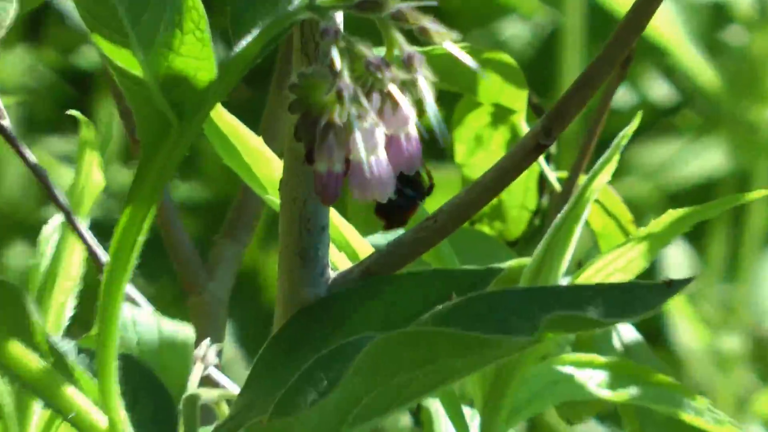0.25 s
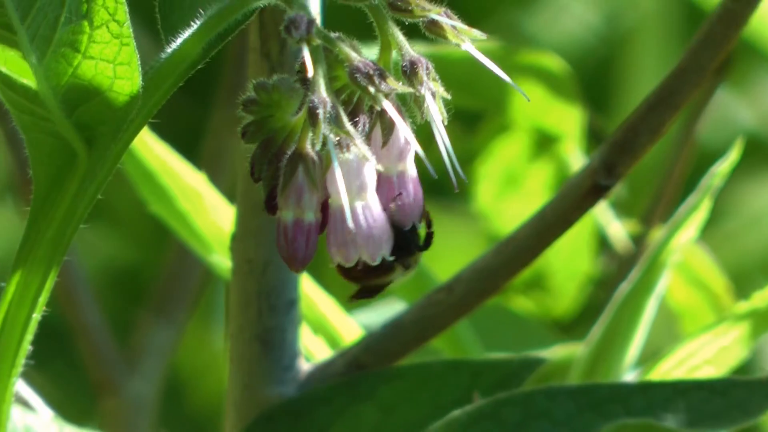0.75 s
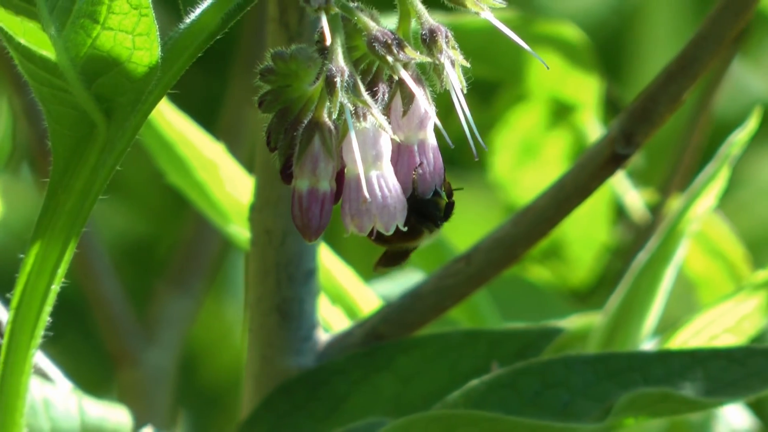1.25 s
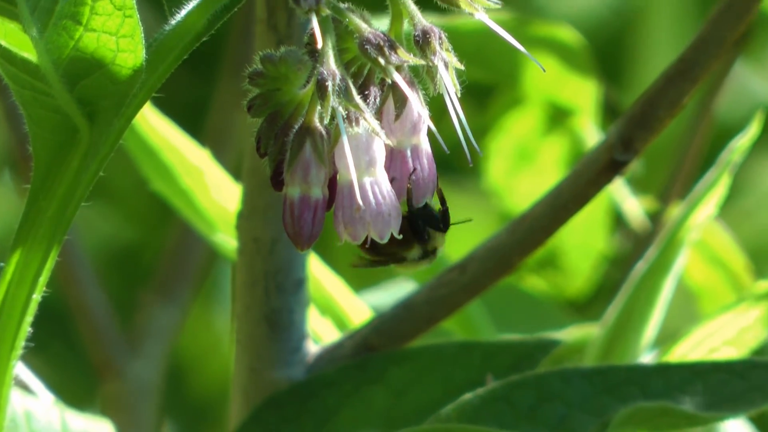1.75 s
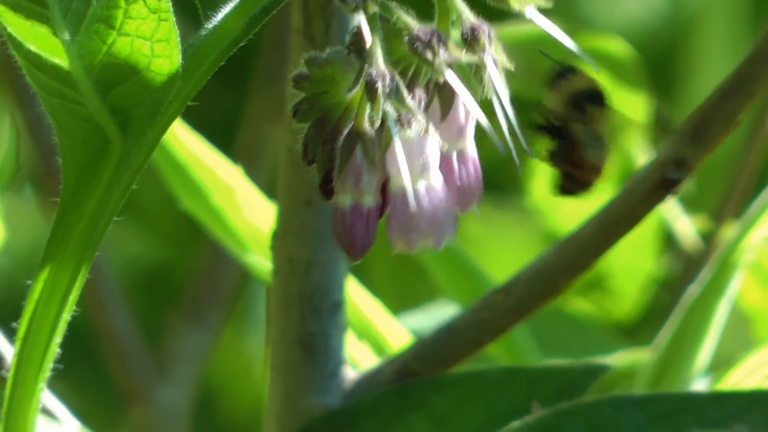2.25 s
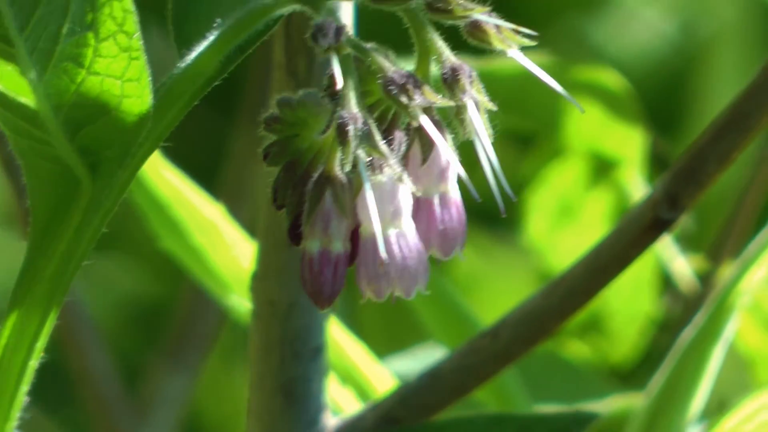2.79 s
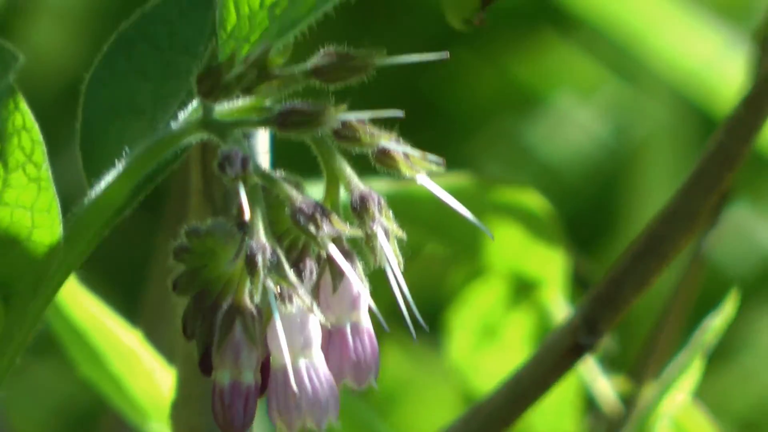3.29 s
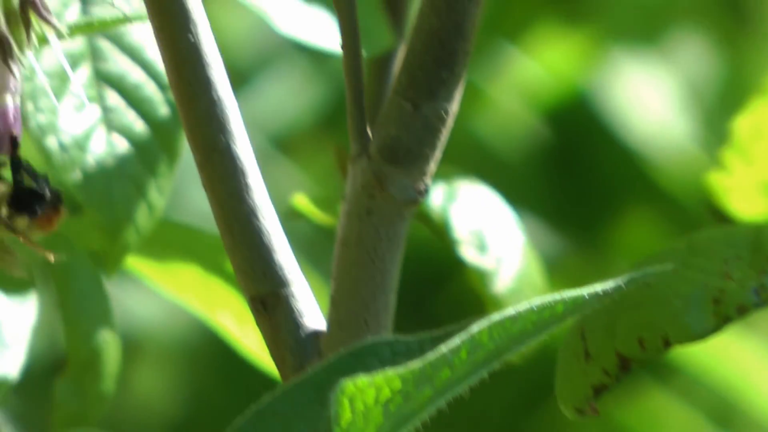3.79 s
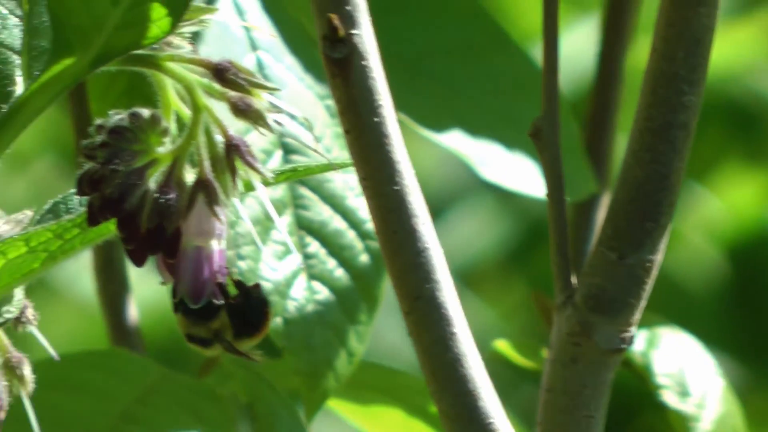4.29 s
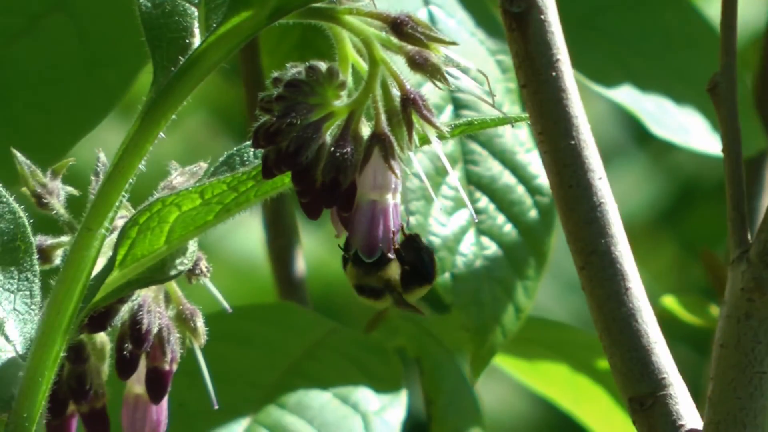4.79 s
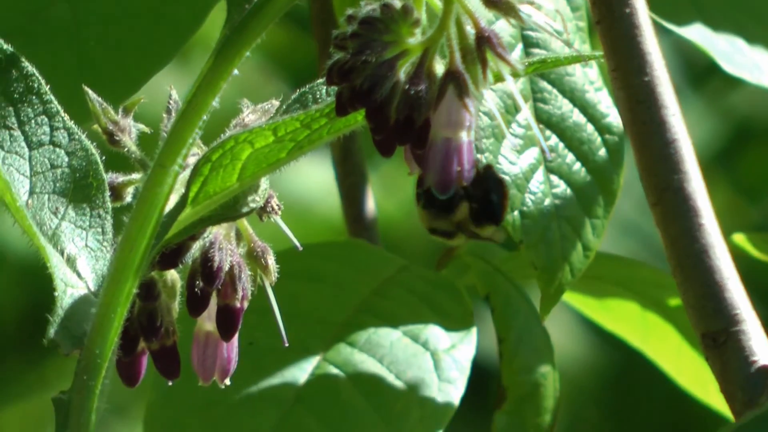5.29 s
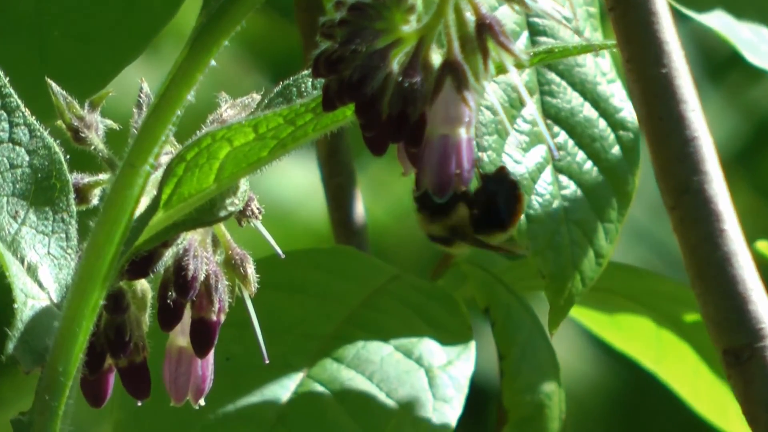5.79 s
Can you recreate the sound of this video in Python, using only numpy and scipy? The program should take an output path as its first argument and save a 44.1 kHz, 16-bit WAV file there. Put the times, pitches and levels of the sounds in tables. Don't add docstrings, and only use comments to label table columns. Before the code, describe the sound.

Outdoors in a garden, a bumblebee hums steadily at first, then stops and starts in soft pulses, rising in pitch as it flies off. After a pause a lower, rougher buzz returns and settles. Small birds twitter quickly at the start and again, louder, at the end, with thin distant whistles between. Leaf hiss and far traffic rumble lie underneath, in stereo leaning right.

```python
import sys
import numpy as np
from scipy import signal
from scipy.fft import rfft, irfft, next_fast_len
from scipy.io import wavfile
from scipy.ndimage import uniform_filter1d

SR = 44100
rng = np.random.default_rng(int(sys.argv[2]) if len(sys.argv) > 2 else 0)


def waveform_to_disk(signal):
    frames = np.transpose(np.atleast_2d(signal))
    scaled = np.clip(frames, -1, 1) * 32767
    samples = np.round(scaled).astype(np.int16)
    wavfile.write(sys.argv[1], SR, samples)


def nominal_scale(level):
    x = np.asarray(level, float) / 20
    return 10 ** x


N = 266540


def rms_one(x):
    return x / np.sqrt(np.mean(x ** 2) + 1e-20)


def at_hz(points, hz):
    table = np.array(points)
    return np.interp(np.log(hz), np.log(table[:, 0]), table[:, 1])


def drift(rate, count):
    r = np.exp(-2 * np.pi * rate / SR)
    settle = 8192
    white = rng.standard_normal((count // settle + 2) * settle)
    return rms_one(signal.lfilter([1], [1, -2 * r, r * r], white)[settle:][:count])


def panned(x, lean_db):
    left = nominal_scale(lean_db)
    return np.array([x * left, x]) * 2 / (1 + left)


def tone(rows, fade_s, wobble, flutter_db, overtone_db=None):
    s, hz, db, *second = np.transpose(rows)
    first = max(0, int((s[0] - fade_s) * SR))
    at = np.arange(first, min(N, int((s[-1] + fade_s) * SR)))
    t = at / SR
    edge = np.clip(np.minimum(t - s[0] + fade_s, s[-1] + fade_s - t) / fade_s, 0, 1)
    depth, rate = wobble
    pitch = uniform_filter1d(np.interp(t, s, hz), size=99) * (1 + depth * drift(rate, len(t)))
    phase = 2 * np.pi * (np.cumsum(pitch) / SR + rng.random())
    level = np.interp(t, s, db) + flutter_db * drift(rate, len(t))
    upper = np.interp(t, s, second[0]) if second else level + overtone_db
    wave = nominal_scale(level) * np.sin(phase) + nominal_scale(upper) * np.sin(2 * phase)
    out = np.zeros(N)
    out[at] = np.sqrt(2) * edge ** 2 * wave
    return out


def glides(events, bend, peak_at, start_db, end_db, turn_at=None):
    share = np.linspace(0, 1, 13)
    peak_at = np.clip(peak_at, .05, .95)
    moved = 1 - np.abs(1 - share / turn_at) ** bend if turn_at else share ** bend
    rise_db = start_db * np.abs(1 - share / peak_at) ** 2.4
    fall_db = end_db * np.abs((share - peak_at) / (1 - peak_at)) ** 2.2
    swell_db = np.where(share < peak_at, rise_db, fall_db)
    return [np.transpose([s + length * share, first + (last - first) * moved, db + swell_db])
            for s, length, first, last, db in events]


def low_source(x):
    lag_s = .00055
    left, right = panned(x, -3.1)
    left = np.interp(np.arange(N) - lag_s * SR, np.arange(N), left)
    return np.array([left, right])


# (t/s, wingbeat f/Hz, level/dB)
HOVERING = [(0, 181.4, -27.5), (.25, 182.4, -32.5), (.5, 180, -36), (.7, 181.4, -33.5), (.87, 180.7, -41),
            (1.06, 180, -37), (1.11, 177.1, -49), (1.2, 177.5, -42), (1.28, 177, -51)]
# (t/s, wingbeat f/Hz, level/dB)
CLIMBING = [(0, 115.4, -39), (.25, 115.4, -46), (.561, 126.3, -43.5), (.75, 127.9, -45), (1.15, 134, -49),
            (1.33, 137.1, -41), (1.42, 137, -44), (1.52, 140, -37.5), (1.68, 144, -50), (1.78, 147.5, -40),
            (1.9, 153.5, -48), (2.02, 155.5, -33), (2.15, 153.4, -40.5), (2.22, 152, -48)]
# (t/s, wingbeat f/Hz, level/dB, second harmonic level/dB)
LOADED = [(3.24, 104.2, -46, -49), (3.3, 102.7, -35, -41.5), (3.43, 101.8, -49, -50),
          (3.55, 101.5, -37.5, -54), (3.8, 101.3, -38, -42.5), (4.0, 101.9, -34, -44),
          (4.2, 101.6, -36.5, -44), (4.42, 100.6, -36.5, -47), (4.5, 99, -45.5, -48),
          (4.75, 99.4, -52, -51)]
# (t/s, wingbeat f/Hz, level/dB)
SINKING = [
    (2.601, 117.6, -56),
    (2.72, 119.3, -35.5),
    (2.9, 113.3, -37),
    (3.2, 103.7, -52),
]


def bumblebee():
    wings = (tone(HOVERING, 0.049, (.003, 5), 0.45, overtone_db=-36)
             + tone(CLIMBING, .05, (.006, 6), 1.2, overtone_db=-36)
             + tone(LOADED, .04, (.006, 5), 0.8)
             + tone(SINKING, .04, (.003, 5), 0.46, overtone_db=-13.5))
    return low_source(wings)


# (delay t/s, level over the foliage/dB)
WALLS = [
    (.021, 2),
    (.044, 8),
]


def echoes(x, start_s, spread_s, t60):
    t = np.arange(int(.5 * SR)) / SR
    walls = 1 + sum((nominal_scale(db) - 1) * np.exp(-((t - s) / spread_s) ** 2) for s, db in WALLS)
    decay = nominal_scale(-60 * t / t60) * np.clip(t / start_s - 1, 0, 1)
    tail = rng.standard_normal((2, len(t))) * walls * decay
    tail = tail / np.sqrt(np.sum(tail ** 2, axis=1, keepdims=True))
    return signal.fftconvolve(x[None], tail, axes=1)[:, :N]


def bird(notes, level_db, lean_db, echo_db, echo_lean_db, flutter_db):
    song = sum(tone(note, .004, (.003, 150), flutter_db, overtone_db=-32) for note in notes)
    direct = nominal_scale(level_db) * song
    paths = np.arange(N) + 3.2 * drift(45, N)
    wet = np.array([np.interp(paths, np.arange(N), side) for side in echoes(direct, .005, .005, .6)])
    return panned(direct, lean_db) + nominal_scale(echo_db) * wet * panned(0.83, echo_lean_db)[:, None]


# (t/s, length
# t/s, start f/Hz, end f/Hz, peak level/dB)
STROKES = [(0.018, .012, 4000, 3800, -42), (.792, .015, 2700, 3200, -39.5), (3.28, 0.032, 3100, 3122, -45),
           (5.1, 0.035, 3900, 3600, -51), (4.99, .07, 3000, 3050, -52), (5.518, 0.017, 3200, 2100, -36),
           (.547, .036, 4010, 4800, -47), (.745, .06, 5260, 5200, -51), (0.35, .045, 4700, 4200, -51),
           (.41, .07, 3450, 3350, -48), (.846, 0.0192, 4400, 3700, -39), (5.424, .02, 3420, 3800, -43.5),
           (3.155, .04, 3100, 3150, -49)]
# (t/s, length t/s, start f/Hz, turning f/Hz, peak level/dB)
SLIDES = [
    (4.645, .023, 3690, 3900, -41.5),
    (4.483, .022, 3800, 3650, -44),
    (0.085, 0.017, 4400, 4950, -48),
]
# (t/s, length t/s, edge f/Hz, top f/Hz, peak level/dB)
ARCHES = [
    (4.755, 0.05, 4140, 4270, -40),
    (4.76, 0.04, 4030, 4100, -48),
    (4.96, 0.032, 3940, 4040, -48),
]


def near_song():
    return (glides(STROKES, bend=1.42, peak_at=0.6, start_db=-9, end_db=-6)
            + glides(SLIDES, bend=2.1, peak_at=0.81, start_db=-6, end_db=-5, turn_at=0.773)
            + glides(ARCHES, bend=1.66, peak_at=.52, start_db=-4, end_db=-5, turn_at=0.46))


# (t/s, f/Hz, level/dB)
OPENING_SYLLABLES = [
    [(.05, 3870, -46), (.06, 4020, -41), (.072, 4420, -40)],
    [(.123, 4400, -40), (.135, 4220, -40), (.147, 4010, -33.5), (.154, 3470, -35), (.16, 3050, -47)],
    [(.162, 3620, -41), (.169, 3780, -37), (.178, 3900, -42)],
    [(.244, 4800, -44), (.253, 4640, -40), (.262, 4430, -33), (.272, 3980, -41), (.276, 4250, -45)],
    [(.281, 4540, -37), (.288, 4410, -36), (.297, 4210, -40), (.304, 4450, -42)],
    [(.368, 3210, -38), (.38, 3240, -38), (.388, 3390, -30), (.396, 3610, -32.5)],
    [(4.918, 3546, -43), (4.925, 3720, -40), (4.931, 4020, -37.5), (4.95, 4010, -40)],
    [(5.026, 3800, -50), (5.045, 4020, -42), (5.065, 4100, -41), (5.08, 3980, -43), (5.088, 3750, -46)],
    [(5.04, 4180, -43), (5.065, 4330, -36), (5.085, 4280, -41), (5.095, 4100, -43)],
]
# (t/s, f/Hz, level/dB)
FOLIAGE_SYLLABLES = [
    [(.493, 5620, -46), (.497, 4610, -35), (.501, 4000, -32.5), (.509, 4004, -32), (.52, 4010, -38),
     (.53, 3830, -39), (.538, 3520, -37), (.544, 3150, -38), (.551, 2750, -41)],
    [(.568, 2950, -48), (.572, 3200, -42), (.58, 2660, -41), (.588, 2120, -39)],
    [(.593, 2520, -44), (.597, 2890, -39), (.605, 3184, -37), (.617, 3410, -31), (.63, 3730, -35.5),
     (.634, 3640, -40)],
    [(.72, 4304, -49), (.728, 4930, -39), (.733, 5300, -32), (.738, 4570, -37), (.743, 4060, -32.5),
     (.75, 3900, -33), (.76, 4000, -47)],
    [(.814, 4700, -52), (.82, 4450, -39), (.828, 4090, -34.5), (.835, 3780, -33), (.845, 3250, -42)],
]
# (t/s, f/Hz, level/dB)
LANDING_SYLLABLES = [
    [(5.156, 3430, -42), (5.168, 3410, -40), (5.175, 3110, -37), (5.184, 2580, -38), (5.193, 2200, -47)],
    [(5.234, 2880, -43), (5.245, 3270, -41), (5.254, 3740, -37), (5.261, 3790, -30), (5.266, 3600, -41)],
]
# (t/s, f/Hz, level/dB)
PERCH_SYLLABLES = [
    [(5.343, 3800, -47), (5.354, 3500, -37), (5.364, 2960, -39), (5.372, 3065, -37), (5.38, 3385, -31),
     (5.39, 3450, -33), (5.402, 3350, -46)],
    [(5.464, 2130, -46), (5.484, 2680, -34), (5.494, 2955, -33), (5.499, 3260, -33), (5.506, 2770, -30),
     (5.522, 2100, -42)],
    [(5.6, 3840, -46), (5.612, 3830, -35), (5.624, 3766, -30.5), (5.634, 3580, -31), (5.64, 3200, -31),
     (5.645, 2850, -40)],
    [(5.694, 3060, -38), (5.7, 3030, -34), (5.709, 2550, -33), (5.716, 2810, -37), (5.722, 3040, -27),
     (5.731, 3170, -32), (5.739, 2850, -43)],
    [(5.808, 4000, -38), (5.822, 3870, -37), (5.833, 3780, -25), (5.841, 3650, -37), (5.85, 2950, -37)],
    [(5.904, 4060, -38), (5.916, 4000, -34.5), (5.926, 3770, -29.5), (5.936, 3430, -32), (5.945, 2910, -30),
     (5.951, 2600, -37)],
    [(5.972, 2554, -44), (5.99, 2570, -37), (6.005, 2660, -31.5), (6.02, 2746, -27), (6.045, 2870, -33)],
]


def near_bird():
    hop_s = 5.12
    song = near_song()
    before = [note for note in song if note[0, 0] < hop_s] + OPENING_SYLLABLES + FOLIAGE_SYLLABLES
    after = [note for note in song if note[0, 0] >= hop_s] + LANDING_SYLLABLES + PERCH_SYLLABLES
    return (bird(before, -.8, lean_db=-5.5, echo_db=-.7, echo_lean_db=-10.5, flutter_db=1.8)
            + bird(after, .3, lean_db=-3.5, echo_db=-3.0, echo_lean_db=-10, flutter_db=2.0))


# (t/s, length t/s, start f/Hz, turning f/Hz, peak level/dB)
RIGHT_SLIDES = [(.045, 0.02, 2266, 2230, -44.5), (.345, 0.046, 2340, 2480, -37),
                (.402, 0.02, 2440, 2500, -45), (.49, 0.039, 2567, 2346, -40.5),
                (.835, 0.044, 2550, 2910, -50), (.9, 0.023, 2724, 2630, -39), (1.0, .035, 2950, 3020, -45),
                (3.33, 0.05, 2490, 2770, -45), (3.495, .055, 2830, 2890, -46),
                (4.503, 0.024, 2620, 2500, -43), (4.698, 0.028, 2670, 2556, -43.5)]
# (t/s, f/Hz, level/dB)
RIGHT_DIPS = [
    [(3.383, 2900, -47), (3.398, 2860, -45), (3.405, 2645, -35), (3.415, 2400, -44), (3.43, 2140, -44.5),
     (3.44, 2170, -45), (3.455, 2450, -47), (3.47, 2800, -49)],
    [(3.525, 2847, -41), (3.535, 2507, -41), (3.547, 2374, -39), (3.558, 2500, -44), (3.57, 2710, -43),
     (3.58, 2720, -46)],
]
# (t/s, f/Hz, level/dB)
RIGHT_FALLS = [
    [(3.845, 2613, -50), (3.858, 2630, -43), (3.87, 2800, -46)],
    [(3.88, 2900, -43), (3.893, 2830, -47), (3.903, 2600, -38.5), (3.915, 2294, -37.5), (3.925, 2194, -47),
     (3.937, 2170, -39), (3.96, 2180, -47)],
    [(4.018, 2140, -43), (4.03, 2463, -39), (4.042, 2320, -46), (4.05, 2181, -42), (4.07, 2130, -44),
     (4.088, 2160, -47)],
    [(4.538, 2595, -48), (4.548, 2833, -47), (4.562, 2813, -38), (4.583, 2450, -46), (4.592, 2260, -46),
     (4.61, 2134, -44), (4.628, 2150, -42)],
]


def right_bird():
    slides = glides(RIGHT_SLIDES, bend=2.56, peak_at=0.37, start_db=-4.0, end_db=-4.5, turn_at=0.83)
    return bird(slides + RIGHT_DIPS + RIGHT_FALLS, 0.2, lean_db=-23,
                echo_db=-.8, echo_lean_db=-11.0, flutter_db=1.0)


# (t/s, start f/Hz, peak level/dB)
CHIPS = [(1.751, 4130, -43), (1.865, 4040, -43), (1.977, 3820, -40.5), (2.108, 3960, -41.5),
         (4.455, 5000, -45.5), (4.592, 4176, -42.5), (4.7, 3810, -43), (4.882, 4100, -45)]
# (t/s, length t/s, start f/Hz, end f/Hz, peak level/dB)
HIGH_SLIDES = [(1.345, 0.03, 4880, 4950, -49), (1.275, .025, 5650, 5550, -51),
               (1.47, .022, 4880, 5050, -55), (1.497, .03, 4130, 4450, -53), (1.6, 0.038, 5320, 5700, -48),
               (1.667, .03, 5980, 6050, -49.5), (1.668, .018, 4400, 4500, -47),
               (3.105, .021, 4750, 3150, -37)]
# (t/s, length t/s, edge f/Hz, turning f/Hz, peak level/dB)
HIGH_DIP = [
    (2.4, 0.044, 7500, 6830, -37.5),
]


def overhead_birds():
    length_s, rise = 0.0271, 1.13
    chips = [(s, length_s, hz, hz * rise, db) for s, hz, db in CHIPS]
    calls = (glides(chips + HIGH_SLIDES, bend=1.53, peak_at=0.73, start_db=-10, end_db=-3.5)
             + glides(HIGH_DIP, bend=1.6, peak_at=.55, start_db=-18, end_db=-10, turn_at=0.47))
    return bird(calls, -.6, lean_db=-17, echo_db=-3.7, echo_lean_db=-11, flutter_db=3.0)


# (t/s, length t/s, f/Hz, peak level/dB)
WHISTLES = [(2.44, 0.063, 3700, -50.5), (2.523, .12, 3660, -59), (2.786, 0.067, 3680, -49.5),
            (2.867, 0.11, 3640, -51.5), (3.123, 0.019, 3680, -43), (3.178, .05, 3590, -42),
            (3.25, 0.088, 3640, -53), (3.348, .12, 3600, -64), (3.892, .125, 3650, -54),
            (4.27, 0.19, 3576, -56), (4.5, .1, 3577, -55), (4.612, 0.042, 3600, -52)]


def far_whistler():
    sag = 0.98
    events = [(s, length, hz, hz * sag, db) for s, length, hz, db in WHISTLES]
    notes = glides(events, bend=0.88, peak_at=0.4, start_db=-3, end_db=-2.0)
    return bird(notes, 2.6, lean_db=-17, echo_db=-2.5, echo_lean_db=-8, flutter_db=1.8)


def band(x, hz, octaves):
    edges = np.clip(hz * 2.0 ** np.array([-octaves, octaves]), 50, .45 * SR)
    return signal.sosfilt(signal.butter(2, edges, "band", fs=SR, output="sos"), x)


def rustles(events, hz, octaves, length):
    out, t = np.zeros((2, N + SR)), np.arange(SR // 8) / SR
    swell = np.minimum(t / 0.0051, 1) * np.exp(-(t / max(length, .003)) ** 2)
    for s, db in events:
        grain_db = 4.0 * np.minimum(rng.exponential(1, len(t)), 5)
        grains = rng.standard_normal((2, len(t))) * nominal_scale(grain_db)
        grains[0] = .75 * grains[1] + 0.39 * grains[0]
        out[:, int(s * SR):][:, :len(t)] += nominal_scale(db - 12.5) * swell * rms_one(band(grains, hz, octaves))
    return out[:, :N] * panned(1, -8.5)[:, None]


# (t/s, peak level/dB)
RUSTLES = [(0.201, -30), (0.2164, -44), (0.486, -51), (0.699, -50), (0.721, -32.5), (1.1994, -41),
           (1.29, -36), (1.4494, -39), (1.549, -33), (1.57, -34), (1.668, -29.5), (1.7855, -33.5),
           (2.111, -43), (2.684, -41), (3.636, -41), (.27, -48), (1.03, -48), (4.23, -47), (4.6, -43),
           (5.2, -43), (5.58, -43), (5.0489, -35), (5.4494, -39), (5.929, -31.5)]
# (t/s, peak level/dB)
DRY_RUSTLES = [
    (2.19, -41),
    (2.238, -37),
    (2.297, -40),
]


def leaves():
    return rustles(RUSTLES, 4700, 0.79, 0.038) + rustles(DRY_RUSTLES, 8500, 1.1, 0.026)


# (t/s, peak level/dB, ring f/Hz)
TICKS = [
    (0.2048, -36, 12000),
    (2.1944, -36, 12000),
    (2.2413, -36, 12030),
    (2.2474, -42, 12030),
]


def twigs():
    out, t = np.zeros(N), np.arange(SR // 50) / SR
    for s, db, hz in TICKS:
        click = band(rng.standard_normal(len(t)) * np.exp(-t / .001), hz, .14)
        out[int(s * SR):][:len(t)] += nominal_scale(db - 5.0) * click / np.abs(click).max()
    return panned(out, -9)


# (t/s, length t/s, start f/Hz, end f/Hz, peak level/dB)
FAINT = [(0, 0.871, 205, 206.5, -43), (.15, .45, 57.2, 56, -46), (2.5, 0.42, 350, 326, -52),
         (2.72, 0.25, 320, 316, -52), (3.5, 0.396, 342, 330, -51.5), (2.5, 0.31, 166, 167.5, -48),
         (6, 0.3, 174.6, 176.7, -43), (-0.3, .2, 98, 94, -42), (1.1, 0.22, 110, 91, -45.5),
         (5.3, 0.27, 96, 92, -43), (5.5, 0.36, 112, 120, -45), (2.5, 0.13, 80, 88.7, -43.5)]


def far_drones():
    passes = glides(FAINT, bend=1.05, peak_at=0.53, start_db=-2.0, end_db=-5.5)
    return low_source(sum(tone(rows, .06, (.012, 8), 2.8, overtone_db=-23.0) for rows in passes))


# (f/Hz, level/dB)
STEADY = [(693, -60.5), (1245, -87)]


def machines():
    hum = np.zeros(N)
    for hz, db in STEADY:
        cycles = hz * np.cumsum(1 + 0.0032 * drift(6.8, N)) / SR
        hum += nominal_scale(db + 2.5 * drift(1.7, N)) * np.sin(2 * np.pi * cycles)
    return panned(hum, -4)


# (f/Hz, width f/Hz, level/dB)
DIPS = [(267, 25, -2), (493.4, 31, -7.5), (649.5, 31, -11.5), (904, 78, -7.5), (1000, 29, -9),
        (1170, 41, -7), (1296, 51, -12.5), (1556, 90, -14)]
# (f/Hz, correlation/1)
LIKENESS = [(30, 0.96), (160, 0.99), (270, 0.64), (450, 0.45), (740, 0.23), (1200, 0.33), (3300, 0.54),
            (6000, 0.34), (10000, 0.32), (15000, .4)]
# (f/Hz, level/dB)
LEAN = [(60, -1.5), (160, -4.5), (270, -3.5), (450, -10), (740, -11), (1220, -7), (2010, -11), (3330, -14),
        (8700, -10), (9700, -55), (14300, -56), (15200, -16)]
# (f/Hz, phase/rad)
LEAD = [(40, -.17), (100, -0.39), (200, -0.82), (340, -1.47), (500, -1.75), (700, -0.24), (15000, -0.23)]


def coloured(spectrum):
    size = next_fast_len(N)
    hz = np.maximum(np.arange(size // 2 + 1) * SR / size, 1)
    mid, side = rfft(rng.standard_normal((2, size)))
    alike = np.clip(at_hz(LIKENESS, hz), 0, 1)
    pair = np.sqrt(1 + alike) * mid + np.sqrt(1 - alike) * side * [[1], [-1]]
    dips_db = sum(db / (1 + ((hz - centre) / width * 2) ** 2) for centre, width, db in DIPS)
    halves = np.array([[.5], [-.5]])
    lean = nominal_scale(at_hz(LEAN, hz) * halves) * np.exp(1j * at_hz(LEAD, hz) * halves)
    lean = lean / np.abs(lean).mean(axis=0)
    out = irfft(pair * lean * nominal_scale(at_hz(spectrum, hz) + dips_db), size)[:, :N]
    return out / np.std(out.mean(axis=0))


# (t/s, level/dB)
BREEZE = [(0, 0.5), (1.15, -0.5), (1.4, 0.2), (1.75, .8), (1.95, -0.5), (2.8, 0), (3.3, 0.9), (3.8, -.5),
          (6.04, 1.5)]


def breeze_db():
    return np.interp(np.arange(N) / SR, *np.transpose(BREEZE))


# (f/Hz, spectral level/dB)
HISS = [(900, -41), (1500, -1), (1970, -0.5), (2420, -0.5), (3350, -1.5), (4580, -4.5), (5150, -6.5),
        (6840, -11.5), (8820, -18), (11000, -23), (14500, -25), (15000, -37), (16000, -35)]


def leaf_hiss():
    return nominal_scale(-42 + breeze_db() + 0.5 * drift(6.7, N)) * coloured(HISS)


# (f/Hz, spectral level/dB)
RUMBLE = [(12, -46), (20, -24.5), (79, -1.5), (118, -0.5), (182, -2.5), (265, -10.5), (300, -14.5),
          (390, -28), (660, -120)]
# (f/Hz, spectral level/dB)
MURMUR = [(200, -13), (260, -2), (450, -0.5), (800, -1.5), (950, -7.5), (1450, -8.5), (1700, -13),
          (2000, -38)]


def traffic():
    t = np.arange(N) / SR
    rumble_db = -37.5 - 0.41 * t + 0.76 * drift(16, N)
    murmur_db = -44.5 - 0.3 * t + 0.2 * breeze_db() + 0.83 * drift(3.8, N)
    return nominal_scale(rumble_db) * coloured(RUMBLE) + nominal_scale(murmur_db) * coloured(MURMUR)


def scene():
    birds = near_bird() + right_bird() + overhead_birds() + far_whistler()
    foliage = leaves() + twigs() + leaf_hiss()
    return bumblebee() + birds + foliage + far_drones() + machines() + traffic()


def band_limit(x):
    return signal.sosfilt(signal.butter(12, 15810, fs=SR, output="sos"), x)


def record(dry):
    return band_limit(dry)


dry = scene()
out = record(dry)
waveform_to_disk(out)
```